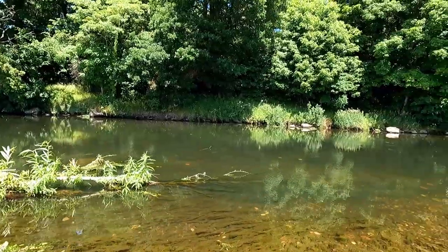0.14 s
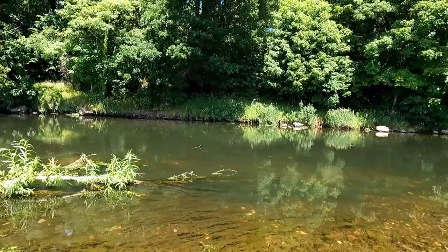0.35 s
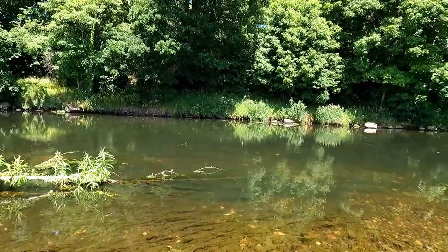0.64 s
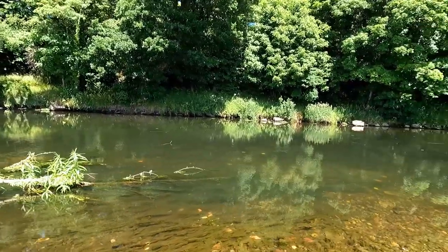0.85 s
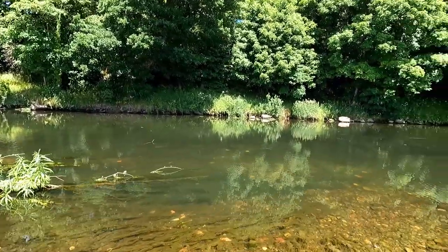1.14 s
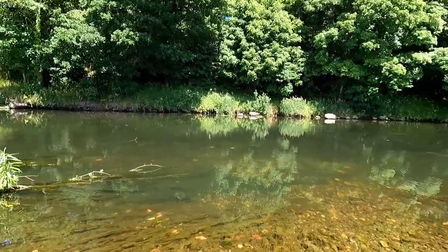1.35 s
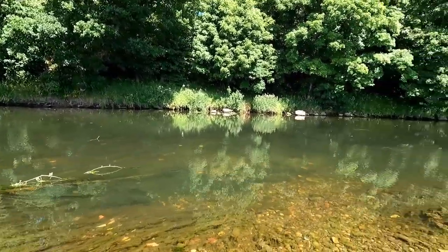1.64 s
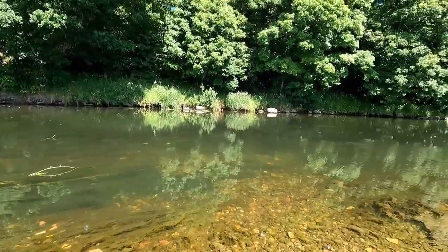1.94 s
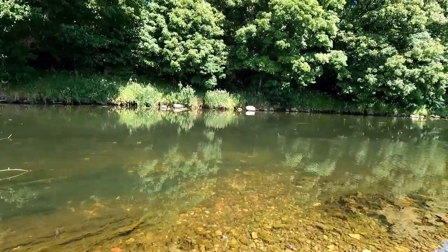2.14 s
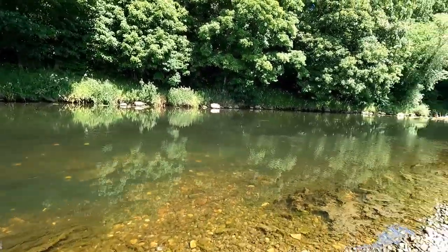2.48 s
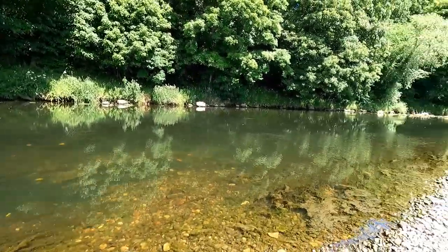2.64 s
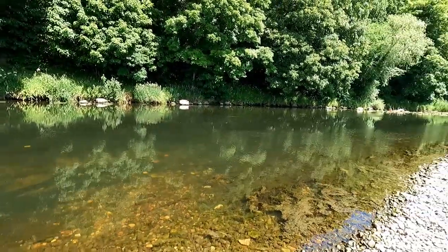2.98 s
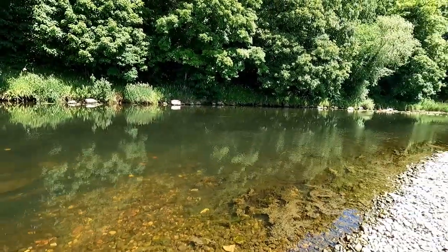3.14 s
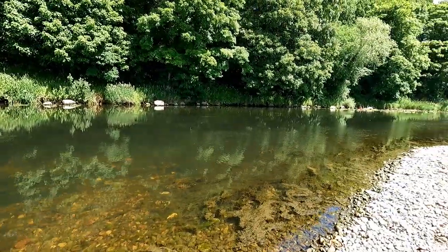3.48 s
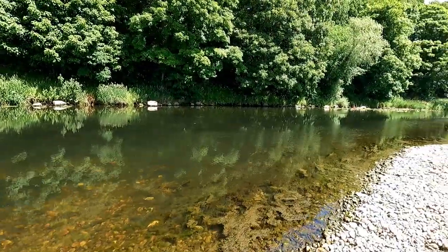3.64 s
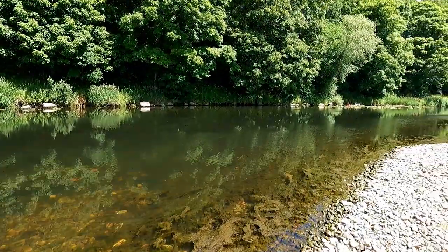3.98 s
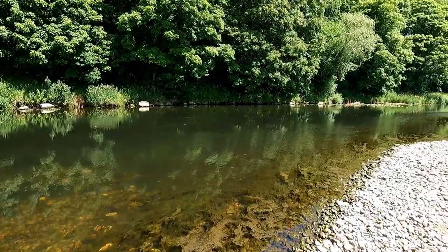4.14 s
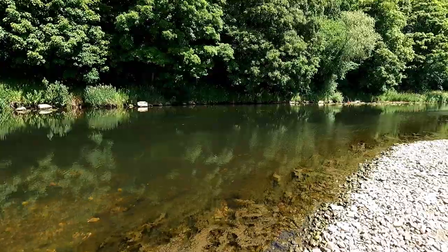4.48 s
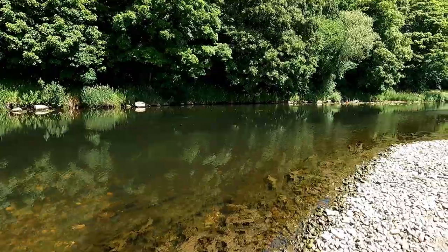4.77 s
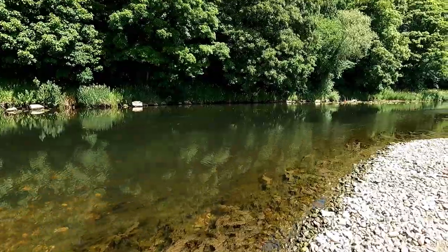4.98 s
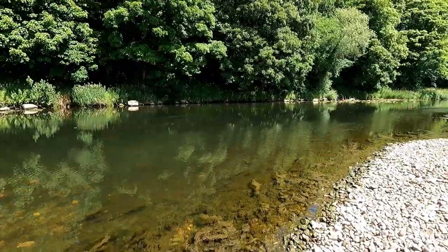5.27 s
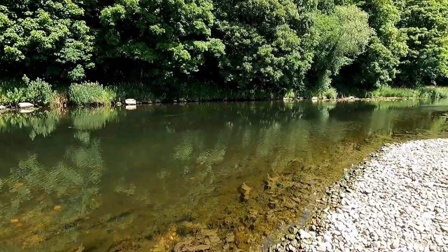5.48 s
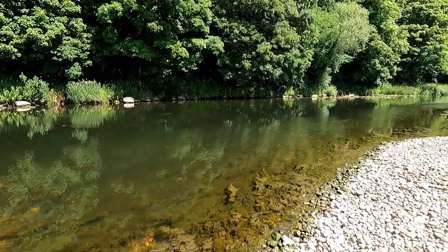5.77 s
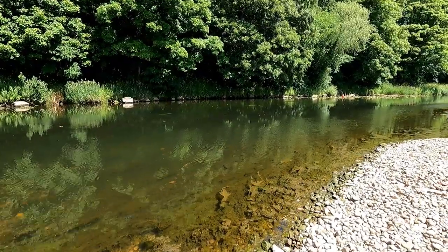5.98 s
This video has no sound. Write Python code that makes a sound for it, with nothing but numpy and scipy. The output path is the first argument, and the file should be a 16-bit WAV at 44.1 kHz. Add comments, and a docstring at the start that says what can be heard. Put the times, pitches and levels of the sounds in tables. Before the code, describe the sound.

Outdoors beside a calm river, a walker treads unhurriedly over dry pebbles, about eight steps with small scuffs between. The early steps are moderate crunches; the fifth is loudest, a sharp grinding rattle followed by scattered stone clacks and a few dry creaks from the hand-held case. Later steps are softer, partly masked by rumbling wind gusts on the microphone. Faint, even water hiss continues throughout.

```python
"""Footsteps grind along a pebble bank beside a slow river: enveloped streams of tiny stone contacts.
One heavy step shoves a resonant heap of stones; loosened pebbles clack as short filtered clicks.
The river is a soft hiss of coloured noise with faint ripples. Wind noise buffets two microphone ports,
gusting towards the end; the same low noise gives one footstep its body.
A hand-held case bumps once and creaks in dry ticks."""
import sys
import numpy as np
from scipy import signal
from scipy.fft import rfft, irfft, next_fast_len
from scipy.io import wavfile
from scipy.ndimage import uniform_filter1d, map_coordinates

SR = 44100
rng = np.random.default_rng(int(sys.argv[2]) if len(sys.argv) > 2 else 0)


def unload_audio(sound):
    """Save the sound as a 16-bit wav file, at the path given as the first command line argument."""
    columns = np.transpose(np.atleast_2d(sound))
    # keep every value between -1 and 1, then stretch to whole-number steps
    steps = np.round(np.clip(columns, -1, 1) * 32767)
    wavfile.write(sys.argv[1], SR, steps.astype(np.int16))


N = 269892  # length in samples

# Levels in the tables are cues; each layer adds its own trim. Left-right is the left level over the right.
# footsteps: [heel strike t/s, heel level/dB, sole delay/s, sole level/dB, time to settle by 20 dB/s,
#             deep stones re sole/dB, grit re sole and re heel/dB]
FOOTSTEPS = [(0.54, -35, 0.031, -36, 0.46, 0, -6.5), (1.338, -28.5, 0.019, -41.5, 0.21, 3.5, -8.5),
             (2.088, -31.5, 0.043, -39.5, 0.81, -3.5, -12), (2.776, -36.5, 0.059, -38, 0.32, -0.5, -10.5),
             (3.379, -26, 0.049, -24, 0.31, -8.5, -5.5), (4.29, -40, 0.1, -34.5, 0.22, -2, -9.5),
             (5.052, -29, 0.19, -35.5, 0.13, -0.5, -8), (5.789, -40, 0.062, -38, 0.24, 4.5, -7.5)]
HEEL_ATTACK_S, HEEL_FALL_DB_PER_S = 0.013, 180
HEEL_DEEP_DB = -8  # relative to the heel, whose edge bites into the small stones on top
ROLL_SHARE = 0.62  # attack of the sole's swell as a share of the delay from heel to sole
# short shoe scuffs during and between the footfalls:
# [t/s, length/s, level/dB, deep stones re level/dB, grit re level/dB]
SHOE_SCUFFS = [(0.005, 0.032, -43, -0.5, -6.5), (0.14, .04, -51, -4, -6), (0.211, 0.033, -41, -1.5, -11),
               (0.289, 0.017, -41, 1, -16), (0.385, 0.021, -38, -1.5, -19), (0.615, 0.026, -38.5, 4.5, -15),
               (0.735, 0.042, -43.5, -15, -7), (0.895, 0.033, -47.5, 6, 3), (1.295, 0.022, -38, -5.5, -7),
               (1.352, 0.025, -35.5, -13, -7), (1.497, 0.026, -43, -16, -10),
               (1.688, 0.083, -50.5, -4, -18), (1.88, .15, -50.5, 2, -17), (2.39, 0.081, -54, -21, 1.5),
               (2.52, 0.29, -55, -2.5, -21.5), (2.96, 0.094, -45, -8, -9), (3.11, 0.26, -50, -9, -9.5),
               (3.521, .035, -25.5, -6, -10), (3.635, 0.036, -41, -13, -6), (3.718, 0.016, -31, -5, 2),
               (3.849, 0.014, -36.5, -4, -10.5), (3.94, 0.052, -50, -3, -10),
               (4.171, 0.033, -44.5, 5.5, -8), (4.245, 0.02, -47, 5, 1), (4.547, 0.017, -32, -5, -9),
               (4.578, 0.011, -37, -3, -5), (4.675, 0.055, -47, -4, -9), (5.115, 0.025, -43, 6.5, -10),
               (5.276, 0.043, -36.5, 9.5, -12), (5.598, 0.26, -48.5, 0, -11), (5.96, 0.055, -46, 12, -11)]
SCUFF_ATTACK_S = 0.014
# stones that keep shifting under the walker's weight; deep and grit relative to the first level
SHIFTING_DB, SHIFTING_DEEP_DB, SHIFTING_GRIT_DB, SHIFTING_SWING_DB = -59.5, -3.5, -9.5, 3
# colour of grinding stones: [f/Hz, level per Hz/dB]
GRAVEL_SPECTRUM = [(80, 4), (180, 7), (350, 6), (600, 3), (950, -6), (1250, -11), (2000, -9), (3700, -12.5),
                   (5000, -17), (6800, -20), (8200, -26), (12200, -37), (15500, -53)]
# how alike the stones sound left and right: [f/Hz, correlation]
STONES_CORRELATION = [(200, 1), (1000, 0.89), (4000, 0.86), (8000, 0.61), (14000, .45)]

# colour of the water: [f/Hz, level per Hz/dB]
RIVER_SPECTRUM = [(100, -16), (300, -21.5), (700, -32), (1000, -18), (1600, -30), (3000, -31),
                  (4700, -33.5), (7400, -38), (8500, -45), (12200, -55.5), (13300, -68), (15500, -78)]
# how alike the river sounds left and right: [f/Hz, correlation]
RIVER_CORRELATION = [(200, 1), (1000, 0.46), (5000, 0.53), (12000, 0.11)]

# strength of the wind on the microphone: [t/s, level/dB]
BREEZE_LEVEL = [(0, -29), (1.0, -28.5), (1.1, -36.5), (1.4, -27.5), (1.85, -31.5), (2.05, -41.5),
                (2.33, -31.5), (2.47, -38), (2.7, -41.5), (2.92, -56), (3.18, -51), (3.3, -38),
                (3.55, -37.5), (3.8, -22.5), (4.05, -32), (4.45, -26.5), (4.7, -33.5), (5.0, -26.5),
                (6.12, -27)]
# the side that the wind strikes: [t/s, left-right/dB]
BREEZE_SIDE = [(0, -2), (1.6, -3.5), (2.8, 1), (3.5, -2), (4.4, 4.5), (4.65, 3), (5.3, 1), (6.12, -11)]
# large eddies that thump the ports: [t/s, level/dB, left-right/dB]
EDDY_THUMPS = [(0.059, -26, -8), (1.569, -23.5, -8), (1.92, -30.5, 1), (2.55, -28, -7.5), (3.268, -25, -3),
               (3.6, -26, -7), (4.234, -22.5, -6.5), (4.41, -21, -6), (4.58, -30, 15), (4.96, -27, 10),
               (5.07, -27, 3), (5.25, -25, -7), (6.01, -21, 3)]
THUMP_RISE_S, THUMP_HOLD_S, THUMP_FALL_DB_PER_S = 0.018, 0.013, 280
# low swells: gusts of wind, save the one near 2.77 s, which is the low body of the footstep there:
# [peak t/s, rise/s, hold/s, level/dB]
LOW_SWELLS = [(0.565, 0.033, 0.03, -40), (0.946, 0.035, 0.015, -37.5), (1.136, 0.017, 0.023, -37.5),
              (1.526, 0.25, .07, -31), (1.902, 0.011, 0.014, -37.5), (2.133, .03, .04, -43),
              (2.472, .03, 0.018, -36), (2.774, .02, 0.038, -39.5), (3.26, 0.01, .12, -28.5),
              (3.774, 0.077, 0.092, -21), (3.924, 0.022, 0.033, -27.5), (4.239, 0.17, 0.36, -32),
              (4.712, 0.017, .01, -32), (4.959, .12, 0.093, -20.5), (5.167, 0.082, 0.22, -17.5),
              (5.462, 0.041, 0.22, -21), (5.868, 0.14, 0.11, -18.5), (6.062, 0.049, 0.068, -18)]
LOW_SWELL_FALL_DB_PER_S = 168
EDDIES_DB = -15.5  # small eddies between gusts, relative to the breeze
# colour of the large eddies: [f/Hz, level per Hz/dB]
BUFFET_SPECTRUM = [(6, -23), (14, -2.5), (42, -2), (75, -5), (116, -12.5), (220, -26), (400, -52),
                   (900, -91)]
# colour of the low swells and the small eddies: [f/Hz, level per Hz/dB]
LOW_SWELL_SPECTRUM = [(40, -9.5), (95, -6), (140, 0.5), (185, 2), (300, -5.5), (400, -14.5), (520, -21),
                      (700, -30), (1300, -70), (3000, -95)]
# the ports' unequal answer to them: [f/Hz, left-right/dB]
PORT_BALANCE = [(60, 18), (110, 5), (200, -4.5), (380, -8.5), (700, 3)]
PORT_LAG_RAD, PORT_CORRELATION = 1.5, 0.92  # the left port trails by about a quarter cycle

# the loudest pebbles striking each other: [t/s, level/dB, pitch f/Hz, width/octaves, left-right/dB]
PEBBLE_CLACKS = [(0.1193, -29.5, 1140, 0.39, 3), (0.5348, -25, 3180, 0.64, 1), (0.5583, -19, 1610, 1.6, 3),
                 (0.5687, -16.5, 4200, 0.79, 1), (0.5856, -21, 5540, 0.54, 5), (0.603, -20, 820, 0.17, 2),
                 (0.9367, -32, 940, 0.31, 18), (2.6633, -31.5, 2980, 0.73, 2),
                 (3.1994, -30.5, 3730, 1.4, 11), (1.2588, -23.5, 1270, 2.2, 10),
                 (1.2909, -20, 3270, 0.77, 1), (1.3037, -20.5, 2510, 0.63, 3), (1.3345, -19, 2200, 1.6, 2),
                 (1.338, -19, 1200, 2.2, 6), (1.3546, -14.5, 3550, 0.26, 1), (2.08, -21.5, 2400, 0.56, 2),
                 (2.1477, -16.5, 704, 0.62, 2), (3.0509, -13.5, 860, 0.36, 1), (3.3725, -16, 1100, 0.8, 0),
                 (3.3764, -14, 1400, 0.73, -4), (3.386, -12, 3240, 7.1, 2), (3.3893, -11, 930, 2, 2),
                 (3.4036, -8.5, 3300, 0.66, -4), (3.411, -13, 2800, 1.9, 3), (3.4826, -13, 1040, 0.45, -1),
                 (3.5, -12, 2620, 0.88, -8), (3.523, -17, 1900, 0.53, -7), (3.529, -13.5, 1090, 1.4, -1),
                 (3.5422, -7.5, 1940, 0.64, -5), (3.5666, -13, 2220, 1.1, -4),
                 (3.5979, -10, 4650, 0.43, -1), (3.6304, -12, 1930, 1.7, -2.5),
                 (3.635, -15.5, 2760, 1.7, 4), (3.659, -18, 1610, 0.42, 0), (3.669, -10.5, 1620, 1.3, -2),
                 (3.6958, -11.5, 1360, 2.4, -1), (3.705, -19, 1720, 0.54, 1), (3.7204, -11, 1710, 0.53, 0),
                 (3.727, -16, 1650, 0.37, 3), (3.7944, -10, 1710, 0.45, 1.5), (4.1249, -17, 1100, 0.62, 7),
                 (4.171, -21.5, 795, 2.1, 13), (4.1863, -27, 1240, 0.68, 9), (4.2233, -13, 704, 0.77, 6.5),
                 (4.2652, -10.5, 1030, 2.2, 6), (4.3073, -14, 1950, 0.74, 6), (4.3225, -14, 2630, 0.44, 2),
                 (4.4229, -11.5, 1370, 0.74, 6), (4.4582, -18.5, 910, 0.23, 7),
                 (4.545, -18, 1540, 0.13, 14.5), (4.5737, -12.5, 1680, 1.2, 6.5),
                 (4.646, -23.5, 1840, 0.39, 12), (4.7574, -26, 940, 0.27, 3), (4.9348, -33, 1690, 0.59, 15),
                 (5.064, -15, 3080, 0.83, -3), (5.2165, -16, 880, 0.74, 1), (5.3346, -18, 870, 0.55, 5),
                 (5.3814, -24.5, 1720, 0.57, 2), (5.4247, -22, 805, 0.74, 4.5),
                 (5.553, -30.5, 1900, 2.3, 2), (5.6812, -28.5, 1150, 0.2, 7), (5.75, -23, 960, 0.67, 7),
                 (5.9286, -22, 1180, 0.79, 10)]
# lesser pebbles that every step loosens: window, level relative to the sole, fall with delay, level scatter
LOOSE_WITHIN_S, LOOSE_DB, LOOSE_FALL_DB_PER_S, LOOSE_SPREAD_DB = 0.45, 8.5, 26, 2.3
# their typical pitch, its scatter, ring width in octaves, typical left-right place
LOOSE_HZ, LOOSE_OCTAVES, LOOSE_WIDTH, LOOSE_SIDE_DB = 1640, 0.67, 0.72, 7.5

# dry creaks of the case in the hand: [start t/s, ticks, gap/s, level/dB]
CASE_CREAKS = [(3.921, 1, .01, -31.5), (3.9468, 9, .01, -36.5), (4.067, 1, .01, -37),
               (4.6983, 2, .0205, -25), (4.7807, 2, .0146, -31), (4.7851, 2, .029, -26.5)]
# colour of one tick: [f/Hz, level per Hz/dB]
CASE_SPECTRUM = [(800, -16), (3200, -6), (4100, 7), (5500, -2.5), (7300, -0.5), (9000, -13.5), (12000, -23),
                 (15500, -49)]

# resonances of the hollows in the heap: [f/Hz, width/Hz, level/dB]
HEAP_RESONANCES = [(312, 160, -19), (442, 150, -8.5), (560, 160, -5), (690, 190, -3.5), (930, 46, 10),
                   (1070, 43, 7), (1430, 290, 2)]
SHOVE_S, SHOVE_DB, SHOVE_ATTACK_S, SHOVE_HOLD_S, SHOVE_FALL_DB_PER_S = 3.374, -20, 0.0057, 0.111, 493

TOP_HZ = 15750  # band limit of the finished sound


def amp(db):
    """Amplitude gain for a level in dB."""
    return 10 ** (np.asarray(db) / 20)


def unit(x):
    """Scale to rms 1."""
    return x / np.sqrt(np.mean(x ** 2) + 1e-20)


def along(points, hz):
    """Interpolate (Hz, value) points on a log frequency axis."""
    f, values = np.transpose(points)
    return np.interp(np.log(hz + 1), np.log(f + 1), values)


def curves(rows):
    """One value per sample for each column after the time."""
    s, *columns = np.transpose(rows)
    return [np.interp(np.arange(N) / SR, s, column) for column in columns]


def wobble(rate):
    """A smooth random curve with rate knots a second."""
    knots = rng.standard_normal(int(N * rate / SR) + 4)
    return map_coordinates(knots, [np.arange(N) * rate / SR])


def filtered(x, response):
    """Shape x with a response given as a function of frequency."""
    size = next_fast_len(N + SR // 2)
    hz = np.fft.rfftfreq(size, 1 / SR)
    return irfft(rfft(x, size) * response(hz), size)[..., :N]


def pan(db):
    """Left and right gains for a level difference."""
    return amp([[db / 2], [-db / 2]])


def stereo(pair, spectrum, alike):
    """Colour two unrelated signals and blend them as mid and side to a set left-right correlation, rms 1."""
    def mid_side_gains(hz):
        turn = np.arccos(np.clip(along(alike, hz), -1, 1)) / 2
        return amp(along(spectrum, hz)) * [np.cos(turn), np.sin(turn)]

    mid, side = filtered(pair, mid_side_gains)
    return unit(np.array([mid + side, mid - side]))


def swell(s, attack_s, hold_s, fall_db_per_s):
    """An envelope that rises to 1 at s seconds, holds and dies away."""
    t = np.arange(N) / SR - s
    rise = np.exp(-(np.minimum(t, 0) / attack_s) ** 2)
    return rise * amp(-fall_db_per_s * np.maximum(t - hold_s, 0))


def impulse(gain):
    """The minimum-phase pulse of energy 1 with this gain spectrum, folded through the cepstrum."""
    cepstrum = irfft(np.log(gain + 1e-6))
    half = len(cepstrum) // 2
    folded = np.r_[cepstrum[0], 2 * cepstrum[1:half], np.zeros(half)]
    pulse = irfft(np.exp(rfft(folded)))
    return pulse / np.linalg.norm(pulse)


def add(out, s, sound):
    """Mix a short stereo sound in at s seconds."""
    part = out[:, round(s * SR):][:, :sound.shape[-1]]
    part += sound[..., :part.shape[1]]


def contacts(count, cycles, spread_db):
    """A stream of tiny stone contacts, each a short damped ring: as heard ahead, and from the side."""
    when, pitch, size, place = rng.random((count, 4)).T
    hz = 250 * 56 ** pitch[:, None]
    t = np.arange(300) / SR
    rings = np.sin(2 * np.pi * hz * t) * np.exp(-hz * t / cycles) * np.sqrt(hz)
    strength = amp(-spread_db * np.log(size * 0.97 + 0.03)) * rng.choice([-1, 1], count)
    index = ((when * N).astype(int)[:, None] + np.arange(len(t))).ravel()
    streams = []
    for gain in (strength, strength * (2 * place - 1)):
        stream = np.bincount(index, (rings * gain[:, None]).ravel(), N)[:N]
        streams.append(unit(filtered(stream, np.sqrt)))  # tilt the sum towards white
    return np.array(streams)


def slips(count, spread_db, t60, creep):
    """Gain of stones that hold, then give way at once and settle, over a steady creep."""
    when, size = rng.random((count, 2)).T
    kicks = np.bincount((when * N).astype(int), amp(spread_db * size) ** 2, N)
    energy = signal.lfilter([1], [1, -amp(-120 / (t60 * SR))], kicks)
    return unit(np.sqrt(creep + energy / energy.mean()))


def patchy(pair, patchy_db):
    """Ever new stones touch, so the colour keeps shifting in patches of time and frequency."""
    z = signal.stft(pair, nperseg=256)[2]
    field = rng.standard_normal(z.shape[1:])
    field = uniform_filter1d(field, size=4, axis=0)
    field = uniform_filter1d(field, size=8, axis=1)
    return signal.istft(z * amp(patchy_db * unit(field)), nperseg=256)[1][:, :N]


def tread():
    """How hard heel, rolling sole and scuffs work the deep stones, the middling ones and the grit."""
    pushes = []
    for s, length, db, deep_db, grit_db in SHOE_SCUFFS:
        # hold for half the length, then fade by 10 dB a length
        pushes.append((amp(db) * swell(s, SCUFF_ATTACK_S, length / 2, 10 / length), deep_db, grit_db))
    for s, heel_db, roll_s, sole_db, settle_s, deep_db, grit_db in FOOTSTEPS:
        heel = amp(heel_db) * swell(s, HEEL_ATTACK_S, 0, HEEL_FALL_DB_PER_S)
        sole = amp(sole_db) * swell(s + roll_s, ROLL_SHARE * roll_s, 0, 20 / settle_s)
        pushes += [(heel, HEEL_DEEP_DB, grit_db), (sole, deep_db, grit_db)]
    shifting = amp(SHIFTING_DB + SHIFTING_SWING_DB * wobble(14))
    pushes.append((shifting, SHIFTING_DEEP_DB, SHIFTING_GRIT_DB))
    power = sum(np.outer(amp([deep_db, 0, grit_db]), force) ** 2 for force, deep_db, grit_db in pushes)
    return np.sqrt(power)


def crunch():
    """The shoe grinds stones of three sizes; they slip in jerks, each jerk a burst of the contact stream."""
    deep_force, middle_force, grit_force = tread()
    sand = amp(-3) * rng.standard_normal((2, N))
    small = contacts(count=16000, cycles=1.0, spread_db=1)
    large = amp(-7.0) * contacts(count=4000, cycles=2.6, spread_db=2.0)  # rings long enough for a pitch
    jerks = slips(count=800, spread_db=12.5, t60=0.04, creep=0.7)
    grinding = patchy(sand + small + large, patchy_db=1.5) * jerks
    bed = stereo(grinding, GRAVEL_SPECTRUM, STONES_CORRELATION)

    def below(hz, edge_hz):
        return 1 / (1 + (hz / edge_hz) ** 6)

    deep = unit(filtered(bed, lambda hz: below(hz, 1630)))
    middle = unit(filtered(bed, lambda hz: below(hz, 5600) - below(hz, 894)))
    grit = unit(filtered(bed, lambda hz: 1 - below(hz, 4070)))
    layers = deep_force * amp(3) * deep
    layers += middle_force * amp(-2.5) * middle
    layers += grit_force * amp(-1.44) * grit
    return pan(0.7) * layers


def river():
    """The soft, even hiss of shallow water and leaves: noise, with faint ripples of damped rings."""
    ripples = amp(-3.5) * contacts(count=5000, cycles=4.8, spread_db=7.5)
    water = rng.standard_normal((2, N)) + ripples
    level = amp(-50.0 + 0.47 * wobble(2.6))
    return pan(1.0) * level * stereo(water, RIVER_SPECTRUM, RIVER_CORRELATION)


def wind_and_step_body():
    """Large eddies push both ports together, small ones flutter across; one step's low body shares their noise."""
    ports = np.array([[0.5], [-0.5]])
    breeze_db = curves(BREEZE_LEVEL)[0] + curves(BREEZE_SIDE)[0] * ports

    thump_power = 0
    for s, db, side_db in EDDY_THUMPS:
        thump = swell(s, THUMP_RISE_S, THUMP_HOLD_S, THUMP_FALL_DB_PER_S)
        thump_power = thump_power + (amp(db) * pan(side_db) * thump) ** 2
    push = np.sqrt(thump_power + amp(breeze_db) ** 2)
    buffet = stereo(rng.standard_normal((2, N)), BUFFET_SPECTRUM, [(30, 0.92), (120, 0.37)])

    swell_power = sum((amp(db) * swell(s, rise, hold, LOW_SWELL_FALL_DB_PER_S)) ** 2
                      for s, rise, hold, db in LOW_SWELLS)
    swell_db = 10 * np.log10(swell_power + amp(breeze_db + EDDIES_DB) ** 2)
    # a shared flutter and a quicker one of each port's own
    flutter = amp(2.4 * wobble(24) + 1.0 * np.array([wobble(60), wobble(60)]))
    air = stereo(rng.standard_normal((2, N)), LOW_SWELL_SPECTRUM, [(200, PORT_CORRELATION)])

    def port_response(hz):
        return amp(along(PORT_BALANCE, hz) * ports) * np.exp(-1j * PORT_LAG_RAD * ports)

    air = unit(filtered(air, port_response))
    slow = filtered(air, lambda hz: 1 / (1 + (hz / 270) ** 6))
    # a harder gust sheds faster eddies
    fast = (air - slow) * amp(0.5 * np.clip(swell_db + 19.0, -14, 3))
    return amp(2.18) * push * buffet + amp(swell_db) * flutter * (slow + fast)


def loosened(count):
    """Each step sets a few more pebbles rolling, later ones softer on average; rows as in PEBBLE_CLACKS."""
    rows = []
    for s, _, _, sole_db, *_ in FOOTSTEPS:
        delays = LOOSE_WITHIN_S * rng.random(count)
        scatter = np.clip(rng.standard_normal((count, 3)), -2, 2)
        for delay, (size, pitch, place) in zip(delays, scatter):
            db = sole_db + LOOSE_DB - LOOSE_FALL_DB_PER_S * delay + LOOSE_SPREAD_DB * size
            hz = LOOSE_HZ * 2 ** (LOOSE_OCTAVES * pitch)
            rows.append((s + delay, db, hz, LOOSE_WIDTH, LOOSE_SIDE_DB + 4 * place))
    return rows


def clacks(level_db=13.5, chatter_db=5, chatter_t60=0.016, scatter_db=-15, scatter_t60=0.021,
           dull_hz=8000, hardness=2.83):
    """Two pebbles meet in a click of a few cycles; a glancing blow chatters, and stones around scatter it."""
    out, t = np.zeros((2, N)), np.arange(2048) / SR
    f = np.fft.rfftfreq(len(t), 1 / SR) + 1
    for s, db, hz, width, side_db in list(PEBBLE_CLACKS) + loosened(count=10):
        ring = 1 / (1 + (np.log2(f / hz) / width) ** 2) / (1 + (0.15 * hz / f) ** 2)
        # a large stone stays in touch longer, which dulls the click
        contact = 1 / (1 + (f / (hardness * hz)) ** 2) / (1 + (f / dull_hz) ** 5)
        chatter = rng.standard_normal(len(t)) * amp(-60 * t / chatter_t60)
        chatter *= amp(chatter_db) * width * np.sqrt(hz / 2000) / np.linalg.norm(chatter)
        chatter[0] += 1  # the first blow
        scatter = rng.standard_normal((2, len(t))) * amp(-60 * t / scatter_t60)
        blows = chatter / np.linalg.norm(chatter)
        blows = blows + amp(scatter_db) * scatter / np.linalg.norm(scatter[0])
        sound = signal.fftconvolve(impulse(ring * contact)[None], blows, axes=1)[:, :len(t)]
        add(out, s, amp(db + level_db) * pan(side_db) * sound / np.linalg.norm(sound.mean(0)))
    return out


def handling(bump_s=3.254, bump_db=-19.5, bump_hz=130, bump_t60=0.03):
    """The grip shifts: one dull bump near the right port, then the case sticks and slips in ticks."""
    out, t = np.zeros((2, N)), np.arange(2048) / SR
    thud = np.sin(2 * np.pi * bump_hz * t) * amp(-60 * t / bump_t60)
    tap = np.sin(2 * np.pi * 620 * t) * amp(7.5 - 60 * t / 0.0038)
    onset = 1 - np.exp(-t / 0.00017)
    add(out, bump_s, amp(bump_db) * pan(-14.0) * (thud + tap) * onset)

    tick = impulse(amp(along(CASE_SPECTRUM, np.fft.rfftfreq(len(t), 1 / SR))))
    for start, ticks, gap, db in CASE_CREAKS:
        for k in range(round(ticks)):
            slip = rng.standard_normal(len(t)) * amp(-60 * t / 0.0063)
            sound = signal.fftconvolve(tick, slip)[:len(t)]
            add(out, start + k * gap, amp(db + 15) * pan(3.2) * sound / np.linalg.norm(sound))
    return out


def heap():
    """A heap of large stones gives way and rattles in the resonant hollows between them."""
    def hollows(f):
        total = 0
        for k, (centre, width, db) in enumerate(HEAP_RESONANCES):
            damping = 1j * f * width
            # neighbours alternate in sign
            total = total + (-1) ** k * amp(db) * damping / (centre * centre - f * f + damping)
        return total

    grinding = contacts(count=16000, cycles=0.61, spread_db=2.5) + rng.standard_normal((2, N))
    rattle = stereo(grinding, GRAVEL_SPECTRUM, STONES_CORRELATION)
    shove = swell(SHOVE_S, SHOVE_ATTACK_S, SHOVE_HOLD_S, SHOVE_FALL_DB_PER_S)
    return amp(SHOVE_DB) * shove * unit(filtered(rattle, hollows))


def scene():
    """Steps, water, wind with one step's low body, loose stones, the hand on the case and the shoved heap."""
    return crunch() + river() + wind_and_step_body() + clacks() + handling() + heap()


def record(dry):
    """Soft saturation rounds off the highest peaks, then a steep filter cuts all above the band limit."""
    rounded = dry / (1 + np.abs(dry / 0.62) ** 6) ** (1 / 6)
    return filtered(rounded, lambda hz: hz < TOP_HZ)


dry = scene()
out = record(dry)
unload_audio(out)
```